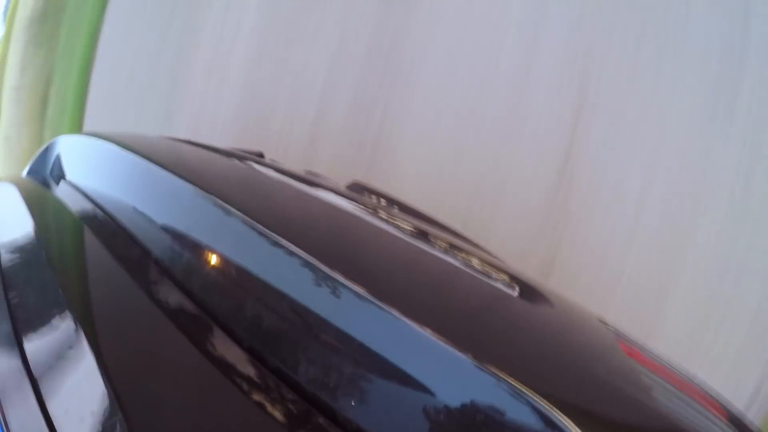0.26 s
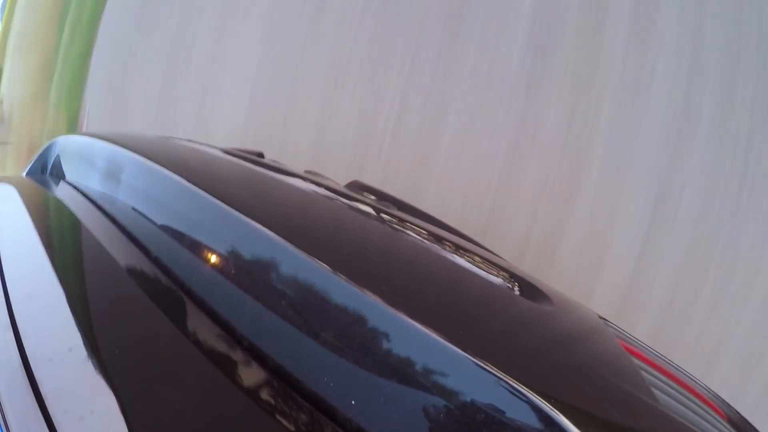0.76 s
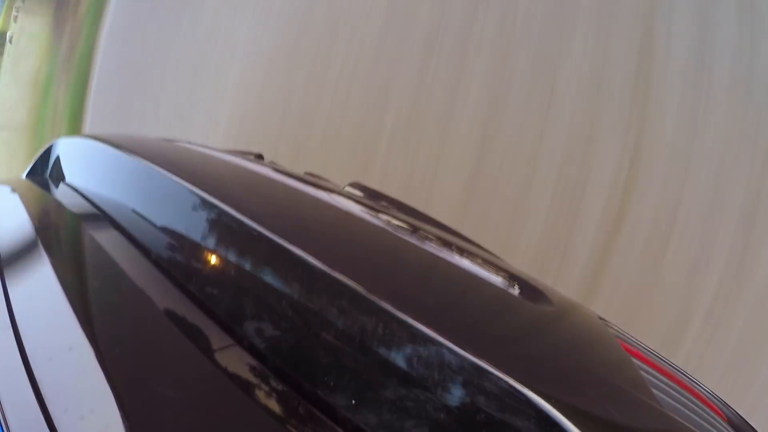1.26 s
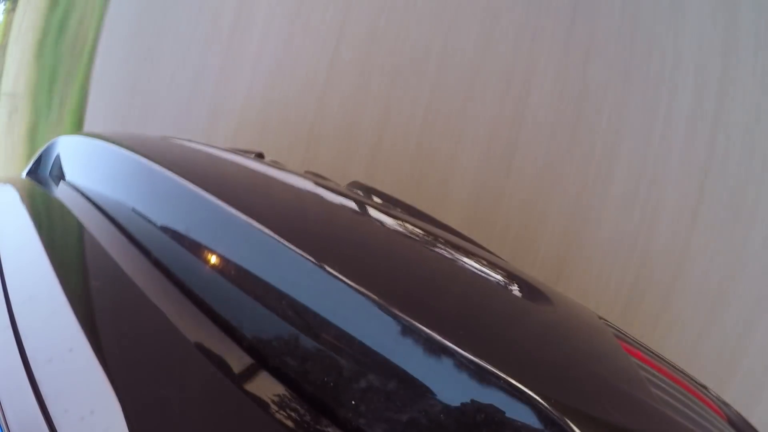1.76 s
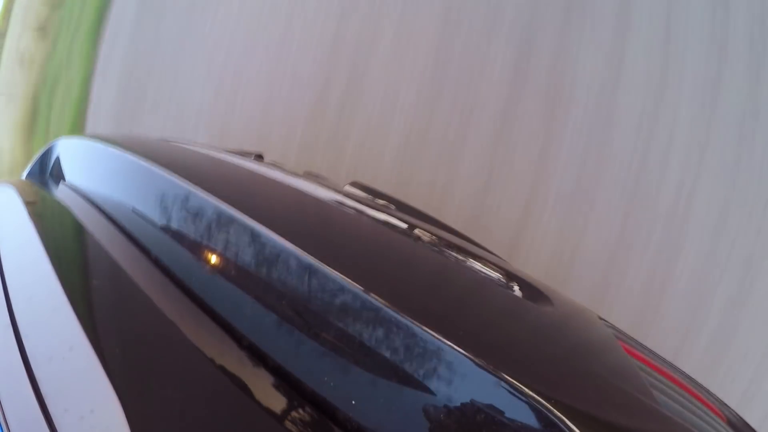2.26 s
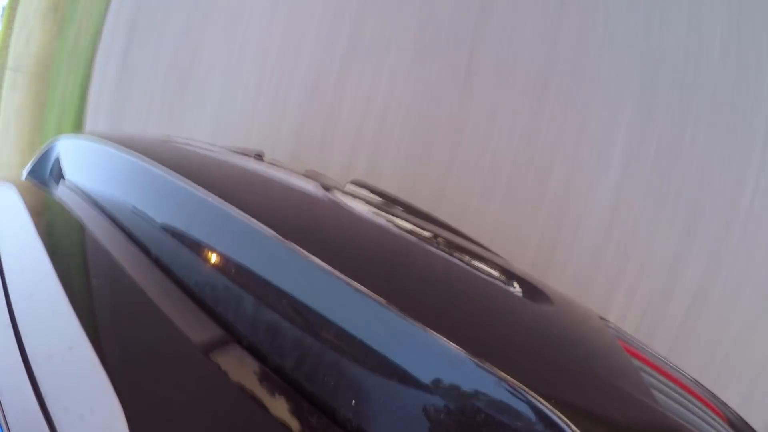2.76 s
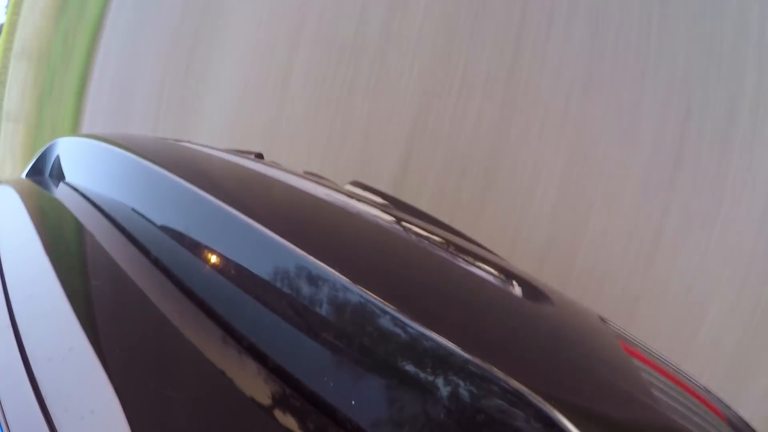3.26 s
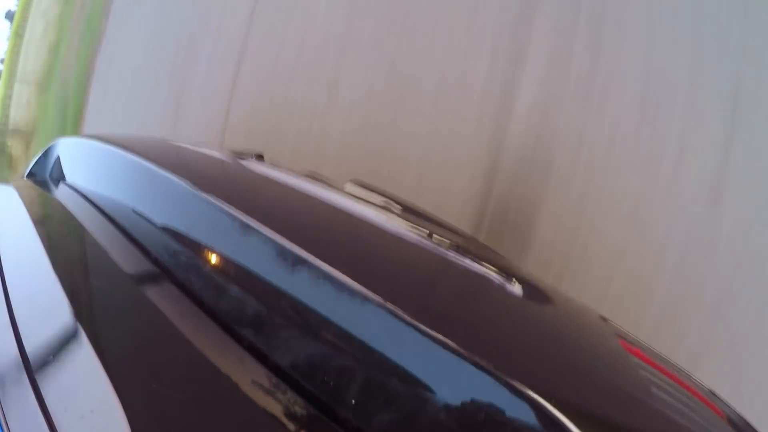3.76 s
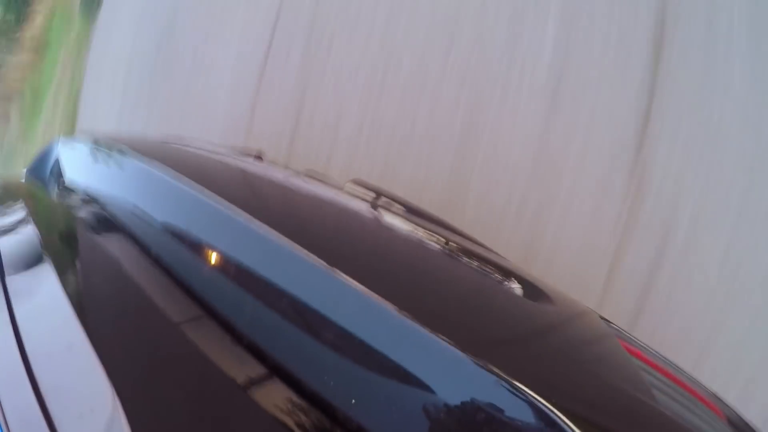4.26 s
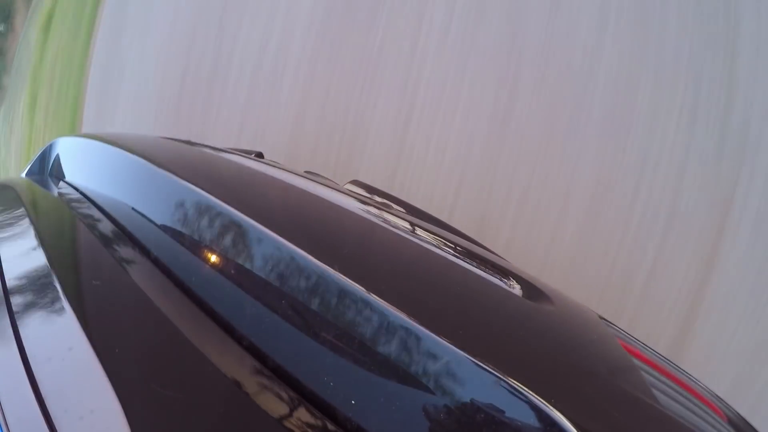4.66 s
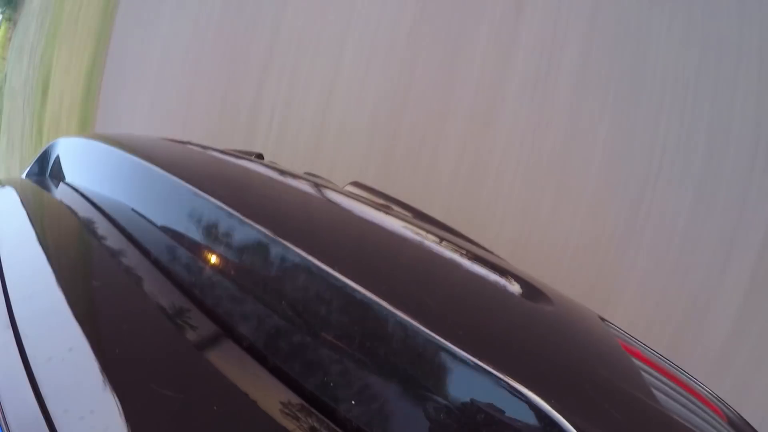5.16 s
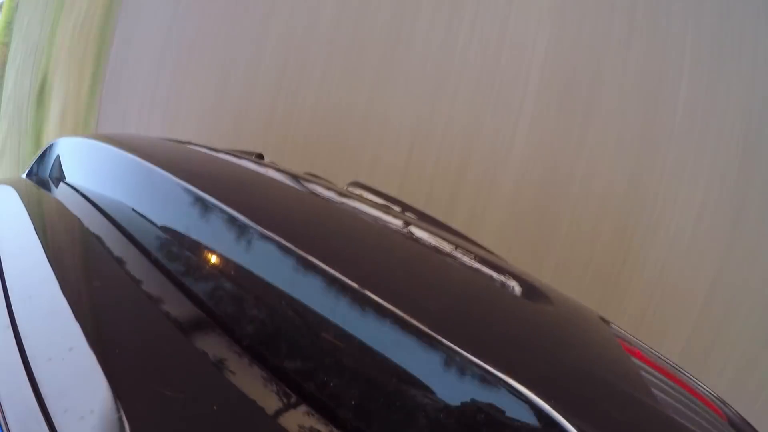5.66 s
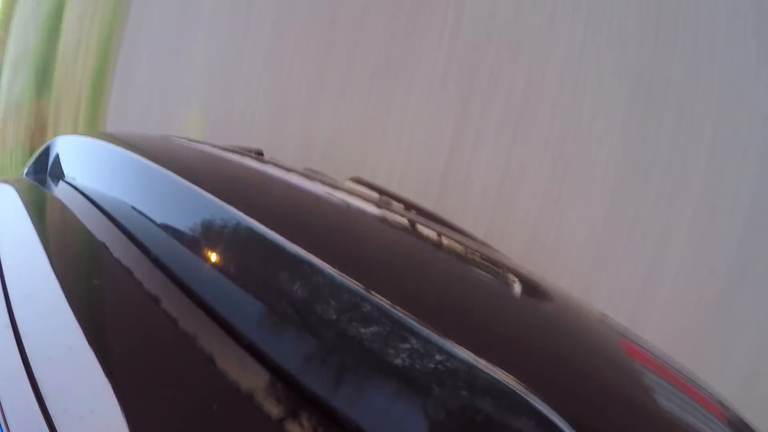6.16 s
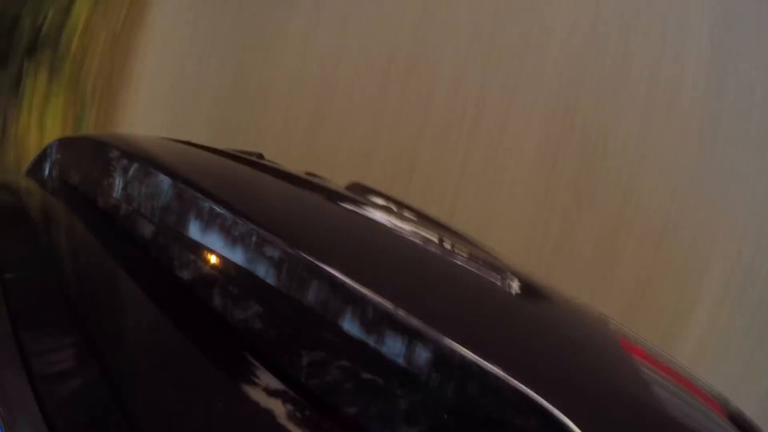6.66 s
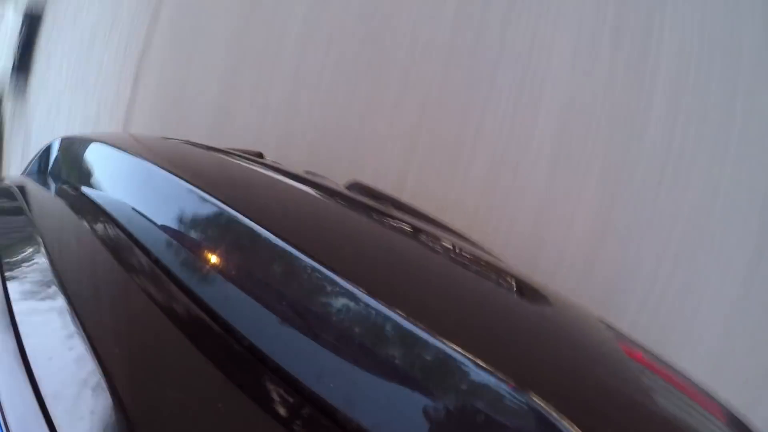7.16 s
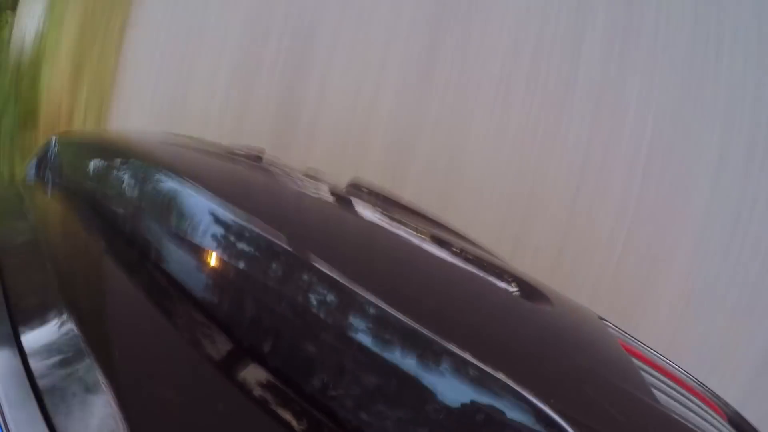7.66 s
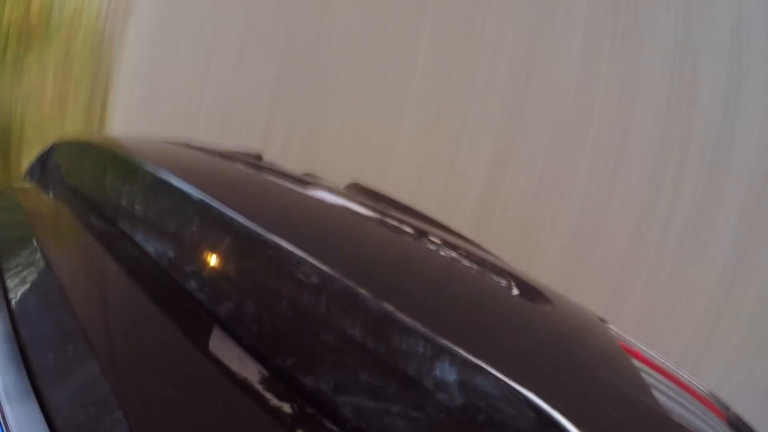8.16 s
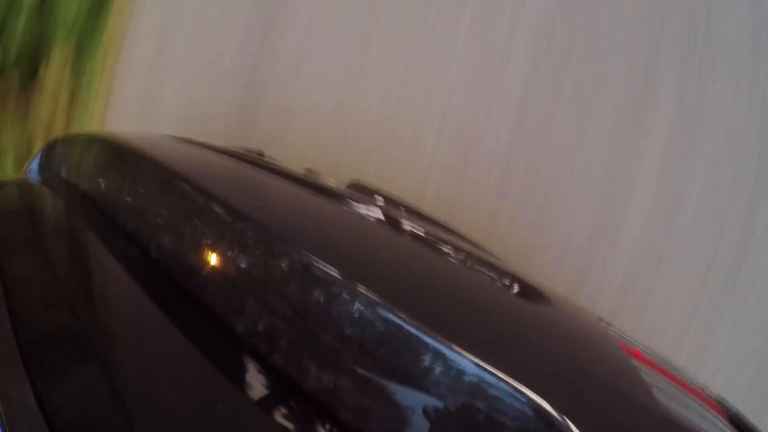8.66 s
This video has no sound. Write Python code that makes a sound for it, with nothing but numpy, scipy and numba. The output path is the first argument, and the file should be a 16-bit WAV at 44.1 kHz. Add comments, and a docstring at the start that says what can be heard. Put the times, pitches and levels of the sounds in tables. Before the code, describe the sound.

Close at a car's tailpipe: low steady boom and buffeting wind, then two barking accelerations, each let off with a loud bang.

```python
"""Turbocharged car pulling hard

A small turbocharged four-cylinder car, heard from its rear bodywork just above the tailpipe. Sines of the
firing rate drone while cruising; filtered firing clicks and noise give the blow, bark and rasp of two pulls.
Short bursts crack; reports with ringing modes backfire once mid-pull and after each of two lift-offs.
Filtered noise makes tyre roar, grit, turbo whistles and wind; the loudest peaks clip."""
import sys
import numpy as np
from scipy import signal
from scipy.fft import rfft, irfft
from scipy.io import wavfile
from numba import njit

SR = 44100
rng = np.random.default_rng(int(sys.argv[2]) if len(sys.argv) > 2 else 0)


def digitize_waveform(pressure):
    """Quantize a signal to 16-bit integers and store it at the path in sys.argv[1].

    Rows of a 2-D input are taken as channels; values are limited to [-1, 1].
    """
    field = np.atleast_2d(pressure).T
    bounded = np.clip(field, -1, 1)
    quanta = np.round(bounded * 32767).astype(np.int16)
    wavfile.write(sys.argv[1], SR, quanta)


N = 392481
TIME = np.arange(N) / SR

# boost and drone steps: (time [s], boost approached re full [dB], drone approached [dB])
BOOST_AND_DRONE = [(0, -42, -13.5), (2.1, -55, -12.5), (3.33, -4.5, -11), (4.6, -14.5, -12),
                   (4.97, -16, -12.5), (5.06, 0.5, -11), (6.359, -49, -35), (6.5, -44.5, -19),
                   (6.92, -2.5, -10), (8.49, -49, -25)]
FALL_S = 0.084  # time constant of falling boost and drone


def from_db(db):
    """Decibels to gain."""
    return 10 ** (np.asarray(db) / 20)


def rms_one(x):
    """Scale to unit power."""
    return x / np.sqrt(np.mean(x ** 2) + 1e-20)


def in_time(rows):
    """Columns of a curve, interpolated at every sample."""
    s, *columns = np.transpose(rows)
    values = [np.interp(TIME, s, c) for c in columns]
    return values[0] if len(values) == 1 else values


def drift(rate_hz):
    """Slow random curve with spread 1: low-passed noise computed at every 40th sample."""
    r = np.exp(-80 * np.pi * rate_hz / SR)
    noise = rng.standard_normal(N // 40 + 2002)
    slow = signal.lfilter([1], [1, -2 * r, r * r], noise)[2000:]  # start-up dropped
    return np.interp(np.arange(N) / 40, np.arange(len(slow)), rms_one(slow))


def colour(x, spectrum, size=8192):
    """Minimum-phase filter with the spectrum's shape; white noise keeps its power."""
    hz, db = np.transpose(spectrum)
    grid_hz = np.maximum(np.arange(size // 2 + 1) * SR / size, 1)
    gain = from_db(np.interp(np.log(grid_hz), np.log(hz), db))
    cepstrum = irfft(np.log(gain))
    # folding the cepstrum makes the response causal
    cepstrum[1:size // 2] *= 2
    cepstrum[size // 2 + 1:] = 0
    response = irfft(np.exp(rfft(cepstrum)))
    return signal.oaconvolve(x, response / np.sqrt(np.sum(response ** 2)))[:N]


def low_pass(order, hz):
    """Butterworth low-pass sections."""
    return signal.butter(order, hz, fs=SR, output="sos")


def clicks(rows):
    """One click for each row of (time [s], level [dB])."""
    s, db = np.transpose(rows)
    index = np.clip(np.round(s * SR).astype(int), 0, N - 1)
    return np.bincount(index, from_db(db), N)


def die_away(x, decay_s):
    """Each click becomes an exponential decay of its own height."""
    return signal.lfilter([1], [1, -np.exp(-1 / (decay_s * SR))], x + 1e-18)


def ring(x, hz, t60_s):
    """A unit click starts a decaying sine of height 1."""
    r = from_db(-60 / (t60_s * SR))
    w = 2 * np.pi * hz / SR
    return signal.lfilter([0, np.sin(w)], [1, -2 * r * np.cos(w), r * r], x + 1e-18)


@njit
def resonate(x, hz, width_hz):
    """Two-pole band-pass with a moving centre and peak gain 1."""
    r = np.exp(-np.pi * width_hz / SR)
    out = np.zeros(len(x))
    for i in range(2, len(x)):
        feedback = 2 * r * np.cos(2 * np.pi * hz[i] / SR) * out[i - 1] - r * r * out[i - 2]
        out[i] = (1 - r * r) / 2 * (x[i] - x[i - 2]) + feedback
    return out


def resonate_twice(x, hz, width_hz):
    """Two equal band-passes in series, for steeper skirts."""
    return resonate(resonate(x, hz, width_hz), hz, width_hz)


def settle(moves, rise_s, fall_s):
    """After each move (time [s], goal) the level approaches the new goal exponentially."""
    level = np.full(N, float(moves[0][1]))
    for s, goal in moves[1:]:
        start = min(int(s * SR), N - 1)
        lag_s = rise_s if goal > level[start] else fall_s
        level[start:] = goal + (level[start] - goal) * np.exp(-TIME[:N - start] / lag_s)
    return level


def swells(rows):
    """Flat-topped humps from rows (middle [s], length [s], height, ..); one curve per height column."""
    s, length_s, *heights = np.transpose(rows)
    humps = 1 / (1 + (2 * (TIME - s[:, None]) / length_s[:, None]) ** 8)
    return np.array(heights) @ humps


def air_stream(lumpy_db):
    """Moving air rumbles at the microphone as lumpy low noise, with gusts and lulls."""
    # gusts and lulls: (middle [s], length [s], change [dB])
    gusts = [(.45, 1, 5.5), (1.5, 0.2, 8.5), (2.1, 0.38, 3), (2.68, 0.39, 1), (3.48, 0.89, 5.5),
             (4.85, 0.36, -10), (6.6, 0.54, -2.5), (7.08, 0.21, 4.5), (8.78, .3, 4)]
    # rumble spectrum: (frequency [Hz], relative density [dB])
    wind_colour = [(10, -15.5), (25, 2.5), (50, 1), (100, -6.5), (170, -14.5), (330, -16.5), (550, -34.5),
                   (1000, -38.5), (4000, -87.5)]
    level_db = -22.5 + swells(gusts)[0] + lumpy_db * drift(13.4)
    return colour(rng.standard_normal(N) * from_db(level_db), wind_colour)


def buffets(eddy_s):
    """Single eddies hit the microphone: low noise bursts that swell and fade in milliseconds."""
    # eddies: (time [s], relative level [dB])
    eddy_hits = [(0.137, -10), (0.262, -13), (0.373, -5.5), (0.711, -10), (1.031, -8.5), (1.408, -14.5),
                 (1.526, -13), (1.593, -15), (2.086, -7.5), (2.112, -13), (2.655, -10.5), (2.708, -12),
                 (3.203, -8), (3.346, -13), (3.615, -13.5), (4.838, -19), (4.862, -14), (5.952, -12),
                 (6.165, -12.5), (7.115, -15), (8.686, -12.5)]
    # eddy spectrum: (frequency [Hz], relative density [dB])
    buffet_colour = [(20, -8.5), (70, 10.5), (180, 1), (350, -2.5), (600, -12), (1100, -24), (4000, -75)]
    eddies = sum(from_db(db) * np.exp(-np.abs(TIME - s) / eddy_s) for s, db in eddy_hits)
    return from_db(3) * colour(eddies * rng.standard_normal(N), buffet_colour)


def tyre_roar(patchy_db):
    """Tread on asphalt roars as broadband noise of drifting level."""
    # roar: (time [s], mean level [dB])
    road_level = [(0, -28), (2.3, -30), (3.2, -27.5), (4.4, -28), (6.35, -24.5), (6.48, -39.5),
                  (6.95, -35.5), (7.9, -23), (8.6, -33), (8.9, -36)]
    # roar spectrum: (frequency [Hz], relative density [dB])
    road_colour = [(100, 3), (400, 9.5), (750, -0.5), (1250, 0.3), (2000, -8), (3000, -15.5), (4500, -24),
                   (6500, -31.5), (10000, -41.5), (15000, -46.5)]
    roar = colour(rng.standard_normal(N), road_colour)
    return roar * from_db(in_time(road_level) + patchy_db * drift(12))


def tread_song(hz, width_hz, wander):
    """Tread sings on patches of asphalt: narrow-band noise of wandering pitch."""
    # singing: (time [s], mean level [dB])
    tread_level = [(0, -35), (.4, -41), (1.2, -46.5), (1.9, -37), (2.5, -50), (3.1, -40), (3.9, -42),
                   (6.5, -60)]
    moving_hz = hz * (1 + wander * drift(2.8))
    song = rms_one(resonate_twice(rng.standard_normal(N), moving_hz, width_hz))
    return from_db(in_time(tread_level) + 0.79 * drift(4)) * song


def grit():
    """Thrown grit ticks on the bodywork: bright, quickly decaying noise bursts."""
    # hits: (time [s], relative level [dB])
    grit_hits = [(0.066, -40), (0.5506, -49), (1.2424, -41), (1.3658, -53), (1.381, -47), (1.4681, -28.5),
                 (1.6122, -43), (1.645, -44), (1.735, -48), (1.7714, -41), (1.8653, -37.5), (1.9694, -44),
                 (3.1516, -45)]
    # hit spectrum: (frequency [Hz], relative density [dB])
    grit_colour = [(1000, -43), (3000, -11), (4700, 4), (7000, -2), (10000, -1.5), (13000, -7.5),
                   (16000, 0)]
    bursts = die_away(clicks(grit_hits), decay_s=0.0019) * rng.standard_normal(N)
    return from_db(4) * colour(bursts, grit_colour)


def tailpipe(x, heat):
    """Reflections lift broad humps, tip modes add narrow peaks; hotter gas raises them all."""
    # reflections in the tip at heat 1: (delay [s], share [ratio])
    pipe_echoes = [(.00102, .66), (.00204, .08), (.0029, .12)]
    # tip resonances at heat 1: (frequency [Hz], width [Hz], lift [dB])
    tip_modes = [(2620, 110, 4), (3270, 270, 3), (4270, 180, 7), (5145, 180, 8.5), (6900, 320, 3),
                 (9700, 500, 2.5)]
    # short waves leave the open end without being reflected
    held = signal.sosfiltfilt(low_pass(2, 4800), x)
    out = x + sum(share * np.interp(TIME - delay_s / heat, TIME, held) for delay_s, share in pipe_echoes)
    for hz, width_hz, lift_db in tip_modes:
        out = out + (from_db(lift_db) - 1) * resonate(out, hz * heat, width_hz)
    return out


def firing_throb(cycles, depth):
    """Gain that beats once per firing."""
    return 1 + depth * np.cos(2 * np.pi * (cycles - .15))


def whistle(curve, cycles, throb, width_share):
    """Turbo wheel whistle: narrow-band noise, wavering in pitch and throbbing with the firings."""
    hz, db = in_time(curve)
    width_hz = width_share * hz.mean()
    hz = hz * (1 + .022 * drift(30))
    tone = rms_one(resonate_twice(rng.standard_normal(N), hz, width_hz))
    return firing_throb(cycles, throb) * from_db(db + 3 * drift(60)) * tone


def turbo(cycles, heat, rush_db, throb):
    """Turbine gas hisses in time with the firings; the wheel adds a main and a thinner upper whistle."""
    # hiss spectrum: (frequency [Hz], relative density [dB])
    rush_colour = [(1400, -11), (1950, 2), (2800, 0.5), (4000, -2.5), (5000, -6.5), (5700, -10.5),
                   (6500, -11), (8300, -14), (9700, -20), (11000, -23), (15000, -31.5)]
    # main whistle, idling then spooling up: (time [s], mean pitch [Hz], mean level [dB])
    spool = [(0, 4340, -57), (.5, 4160, -63), (1.0, 4320, -65), (2.1, 4290, -60), (2.5, 4160, -70.5),
             (3.2, 4400, -68), (3.76, 6200, -57), (3.94, 6830, -41.5), (4.03, 7350, -54), (4.09, 8670, -58),
             (4.2, 9200, -87)]
    # upper whistle under boost: (time [s], mean pitch [Hz], mean level [dB])
    overtone = [(3.5, 8750, -91), (3.72, 8900, -67), (3.9, 9200, -59), (4.1, 9500, -60), (4.35, 9540, -64),
                (5.0, 9500, -73), (5.4, 10360, -66), (6.3, 10750, -92)]
    hiss = tailpipe(colour(rng.standard_normal(N), rush_colour), heat)
    rush = firing_throb(cycles, throb) * from_db(rush_db) * hiss
    main = whistle(spool, cycles, throb=0.68, width_share=0.11)
    upper = whistle(overtone, cycles, throb=0.89, width_share=0.091)
    return rush + main + upper


def drone(cycles, waver_db, lag_cycles):
    """The silencer smooths firings into a nearly pure boom that swells just after each pulse."""
    # harmonics: (multiple of firing rate [ratio], relative level [dB])
    drone_orders = [(1, 2), (2, -23), (3, -26.5)]
    # brief sags: (middle [s], length [s], loss [dB])
    sags = [(.52, 0.33, 3), (3.36, 0.15, 7), (3.7, 0.082, 6.5), (8.48, 0.23, 2.5)]
    phase = 2 * np.pi * (cycles - lag_cycles)
    wave = sum(from_db(db) * np.sin(round(k) * phase) for k, db in drone_orders)
    goals = [(s, db) for s, _, db in BOOST_AND_DRONE]
    level_db = settle(goals, rise_s=0.26, fall_s=FALL_S) - swells(sags)[0]
    return rms_one(wave) * from_db(level_db + waver_db * drift(6.2))


def cracks(heat):
    """Hard firings tear out of the pipe as short bright noise bursts."""
    # cracking firings: (time [s], relative level [dB])
    crack_hits = [(4.5418, -26), (6.2572, -8), (6.2672, -12), (6.2858, -8), (6.2955, -1.5), (6.3245, -13),
                  (6.3342, -6.5), (6.3728, -8), (8.2168, -15), (8.2612, -13.5), (8.2945, -13),
                  (8.3500, -19.5), (8.3946, -6.5), (8.4392, -5)]
    # crack spectrum: (frequency [Hz], relative density [dB])
    crack_colour = [(300, -6), (950, 7.5), (2000, 0), (3300, 1.5), (5000, -7.5), (6500, -11), (9000, -17.5),
                    (12000, -16.5), (16000, -33)]
    burst = die_away(clicks(crack_hits), decay_s=.001) * rng.standard_normal(N)
    return from_db(1.5) * tailpipe(colour(burst, crack_colour), heat)


def backfire(s, db, burn_s, top_hz):
    """Unburnt fuel explodes: report, pipe ringing, a low heave from the silencer and a faint hiss tail."""
    # pipe modes rung by the report: (frequency [Hz], relative level [dB])
    bang_modes = [(770, -0.5), (930, -6.5)]
    # report spectrum: (frequency [Hz], relative density [dB])
    bang_colour = [(60, -17), (250, -14), (420, 2.5), (560, 1.5), (760, 2), (980, 4), (1250, -18),
                   (1700, -13), (3400, -10.5), (5000, -16), (6000, -25.5), (10000, -30.5), (16000, -44)]
    shot = clicks([(s, db)])
    flame = die_away(shot, burn_s) + from_db(-26) * die_away(shot, decay_s=0.044)
    blast = from_db(-5) * flame * rng.standard_normal(N) + from_db(13.5) * shot
    report = signal.sosfilt(low_pass(2, top_hz), colour(blast, bang_colour))
    t60_s = np.log(1000) * burn_s  # modes decay with time constant burn_s
    pipe = sum(from_db(mode_db) * ring(shot, hz, t60_s) for hz, mode_db in bang_modes)
    # the silencer empties just after the report
    late_shot = clicks([(s + 0.00463, db)])
    heave = from_db(2) * ring(late_shot, hz=67, t60_s=0.053)
    return report - pipe - heave


def firings(cycles, chance, uneven, scatter_db, jitter_s):
    """One click per firing; cylinder and burn quality set its strength."""
    # cylinders in firing order: (strength, before scaling by uneven [dB])
    cylinders = [4, 2, -5.5, 3.5]
    s = TIME[np.flatnonzero(np.diff(np.floor(cycles)))]
    burn, delay = chance[:len(s)].T
    db = uneven * np.resize(cylinders, len(s)) + scatter_db * burn
    return rms_one(clicks(np.transpose([s + jitter_s * delay, db])))


def bark_pulses(cycles, heat, chance, spit):
    """Ragged firings and spit excite the tailpipe's two lowest resonances."""
    # bark resonances at heat 1: (frequency [Hz], width [Hz])
    bark_modes = [(800, 300), (1060, 240)]
    # turbulence roughens the bark; timing scatter stands in for it
    bark = firings(cycles, chance, uneven=.4, scatter_db=.8, jitter_s=.00013) + from_db(-7) * spit
    for hz, width_hz in bark_modes:  # in series: a flat band with steep sides
        bark = resonate(bark, hz * heat, width_hz)
    return rms_one(signal.sosfiltfilt(low_pass(4, 1350), bark))


def snarl_pulses(cycles, heat, chance):
    """A higher pipe resonance that some firings excite far more than others."""
    pulses = firings(cycles, chance, uneven=.5, scatter_db=3, jitter_s=.0001)
    return rms_one(resonate_twice(pulses, 2760 * heat, 680))


def exhaust(cycles, heat, blow_db, bark_db, rasp_db):
    """Each firing leaves the pipe as a blow with a steep front, a ragged bark and turbulent spit."""
    # blow spectrum: (frequency [Hz], relative density [dB])
    blow_colour = [(60, -27), (160, 3.5), (215, -3.5), (285, 6), (350, 0), (480, 2.5), (620, -10),
                   (760, -10.5), (1400, -36), (5000, -53), (16000, -73.5)]
    # rasp spectrum: (frequency [Hz], relative density [dB])
    rasp_colour = [(500, -37.5), (1100, -18), (1480, -4.5), (1760, 2), (2150, 2), (2750, -6.5), (3300, -7),
                   (4000, -10), (5200, -16), (6200, -21.5), (9000, -30), (15000, -37.5)]
    chance, bark_chance, snarl_chance = rng.standard_normal((3, 1200, 2))
    blows = firings(cycles, chance, uneven=.55, scatter_db=.7, jitter_s=.00008)
    fronts = firings(cycles, chance, uneven=.85, scatter_db=1.4, jitter_s=.00006)
    puffs = die_away(fronts, decay_s=.0007) + from_db(-17) * die_away(fronts, decay_s=.005)
    spit = rms_one(puffs * rng.standard_normal(N))
    blow = colour(-blows, blow_colour)
    bark = bark_pulses(cycles, heat, bark_chance, spit)
    rasp = rms_one(tailpipe(colour(from_db(-4.5) * spit + fronts, rasp_colour), heat))
    rasp = rasp + from_db(-9) * snarl_pulses(cycles, heat, snarl_chance)
    return from_db(blow_db) * blow + from_db(bark_db) * bark + from_db(rasp_db) * rasp


def under_load(boost_db, full_db, slope):
    """Level at the given boost: full_db at 0 dB boost, slope in dB per dB."""
    return full_db + slope * boost_db


def scene():
    """Boost drives exhaust and turbo hiss; no room, the microphone rides along."""
    # firing rate over two pulls: (time [s], firing rate [1/s])
    firing_rate = [(0.0, 86.92), (0.74, 83.12), (2.15, 78.3), (3.43, 76.11), (4.3, 81.25), (5.08, 88.66),
                   (6.24, 105.78), (6.72, 96.8), (7.08, 82.07), (7.52, 83.84), (8.3, 90.59), (8.9, 86.17)]
    # gas heat: (time [s], factor on pipe resonances [ratio])
    gas_heat = [(3.45, .88), (4.05, .97), (4.3, .945), (4.52, .905), (4.8, .96), (5.1, .945), (5.55, 1.003),
                (5.78, .99), (6.0, 1.05), (6.35, 1.01), (7.0, .89), (7.35, .96), (7.72, 1.0), (7.9, .985),
                (8.15, 1.025), (8.6, .955)]
    # exhaust swells and dips: (middle [s], length [s], change of blow [dB], of bark [dB], of rasp [dB])
    exhaust_changes = [(4.15, 0.26, 0, 0.5, 0), (4.52, 0.19, 7, 6.5, 3.5), (4.81, 0.3, 6.5, -6, 0.5),
                       (5.45, 0.3, 1, -0.5, 1.5), (6.0, 0.47, -1, -1.5, -0.5), (6.3, 0.16, -1.5, 0, 1.5),
                       (6.405, 0.044, 6, 9, 0), (7.85, 0.43, -2, 2, 1.7), (8.26, 0.16, 3, 5.5, 4),
                       (8.43, .18, -1, 5, 1), (8.53, 0.048, 11, 9, 5)]
    # backfires: (time [s], relative level [dB], burn time constant [s], report low-pass [Hz])
    backfires = [(4.4267, -0.5, 0.0017, 2000), (6.8022, 2, 0.0059, 19000), (8.882, 2, 0.0034, 19000)]
    boost_db = settle([(s, db) for s, db, _ in BOOST_AND_DRONE], rise_s=0.45, fall_s=FALL_S)
    blow_change_db, bark_change_db, rasp_change_db = swells(exhaust_changes)
    blow_db = under_load(boost_db, full_db=-15, slope=0.84) + blow_change_db
    bark_db = under_load(boost_db, full_db=-20, slope=0.98) + bark_change_db
    rasp_db = under_load(boost_db, full_db=-23, slope=0.91) + rasp_change_db
    rush_db = under_load(boost_db, full_db=-33.5, slope=0.63)
    heat = in_time(gas_heat)
    cycles = np.cumsum(in_time(firing_rate)) / SR + .11  # one cycle per firing

    wind = air_stream(lumpy_db=2.5) + buffets(eddy_s=0.0075)
    tyres = tyre_roar(patchy_db=1) + tread_song(hz=1363, width_hz=670, wander=0.074) + grit()
    hiss = turbo(cycles, heat, rush_db, throb=0.38)
    boom = drone(cycles, waver_db=0.4, lag_cycles=0.097)
    bangs = cracks(heat) + sum(backfire(*row) for row in backfires)
    pulses = exhaust(cycles, heat, blow_db, bark_db, rasp_db)
    return (wind + tyres + hiss + boom + bangs + pulses)[None]


def record(dry):
    """Peaks clip at full scale, then a steep low-pass removes the top."""
    clipped = np.clip(dry, -1, 1)
    return signal.sosfilt(signal.ellip(10, .1, 80, 15700, fs=SR, output="sos"), clipped)


dry = scene()
out = record(dry)
digitize_waveform(out)
```